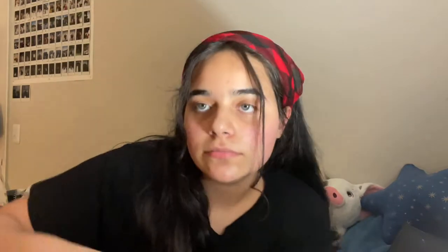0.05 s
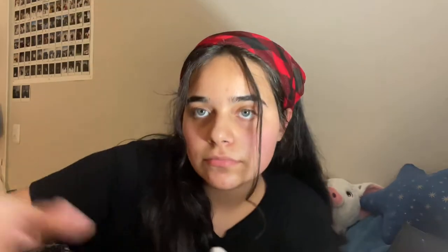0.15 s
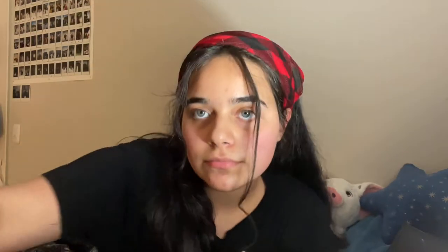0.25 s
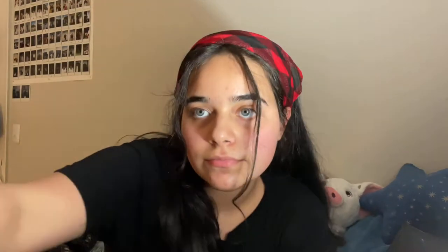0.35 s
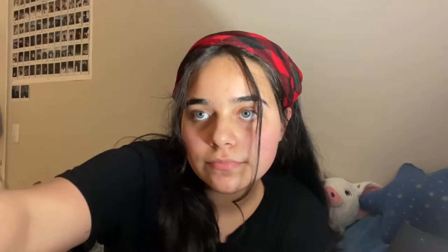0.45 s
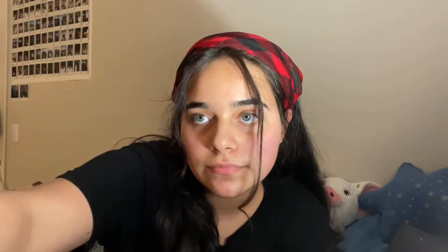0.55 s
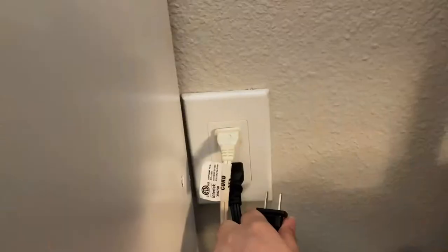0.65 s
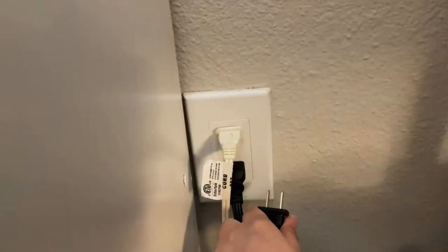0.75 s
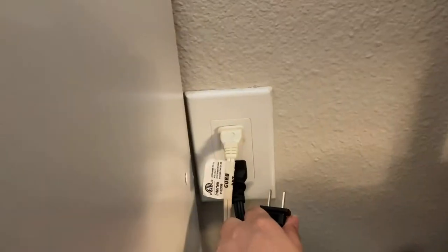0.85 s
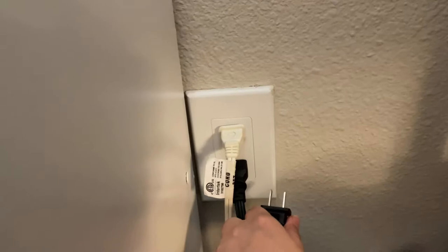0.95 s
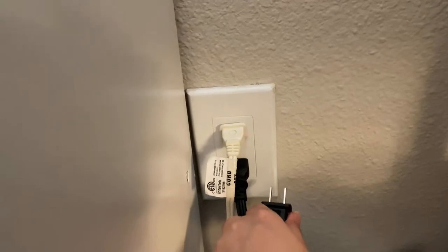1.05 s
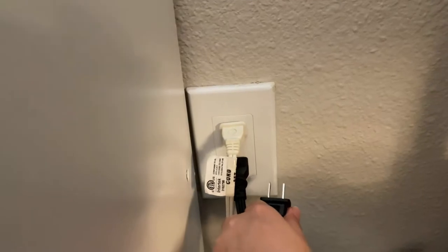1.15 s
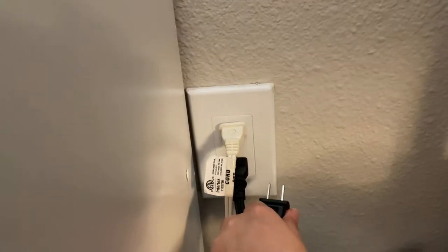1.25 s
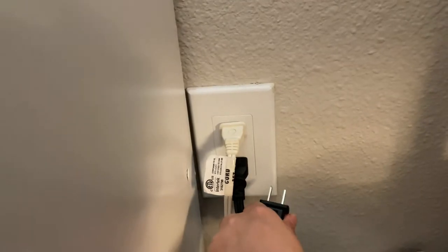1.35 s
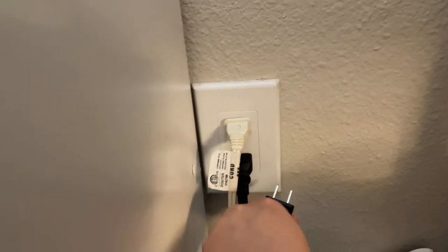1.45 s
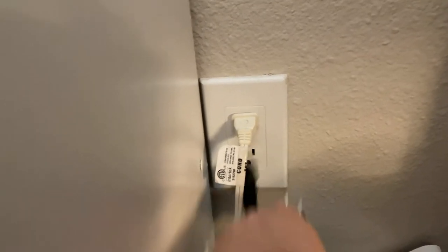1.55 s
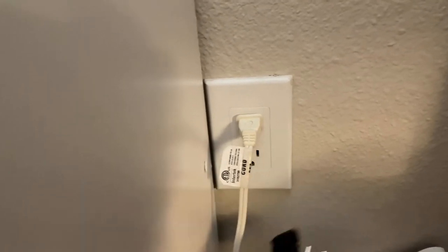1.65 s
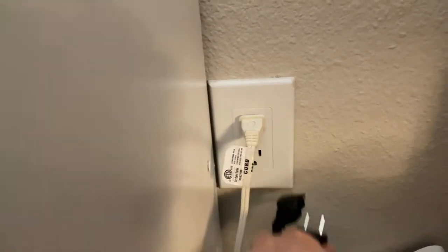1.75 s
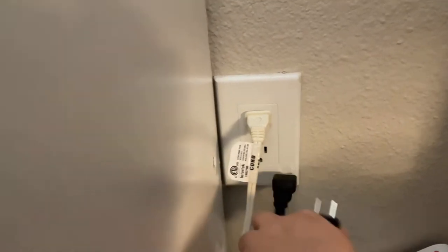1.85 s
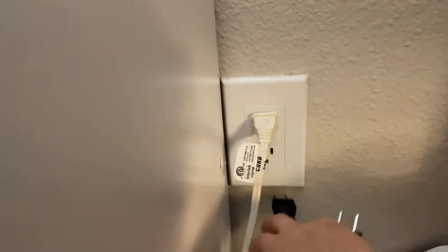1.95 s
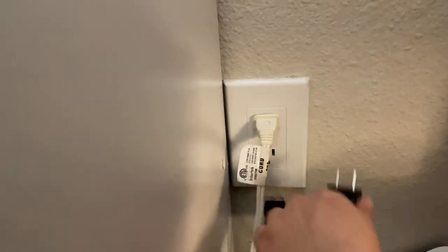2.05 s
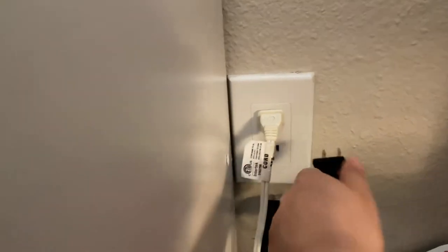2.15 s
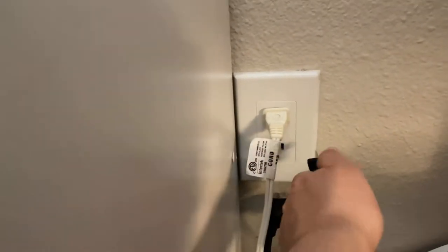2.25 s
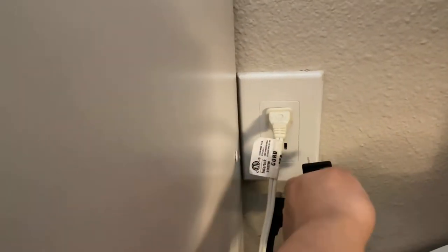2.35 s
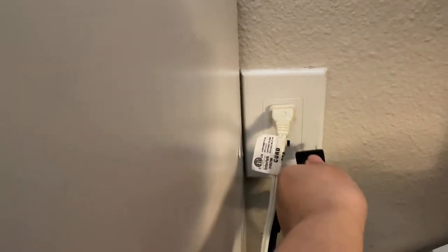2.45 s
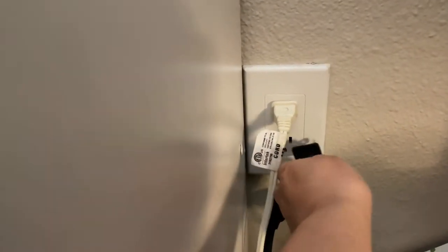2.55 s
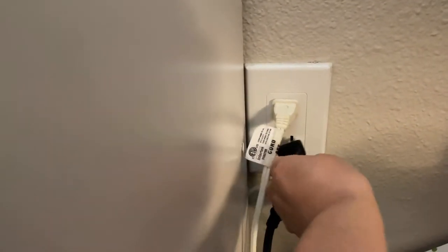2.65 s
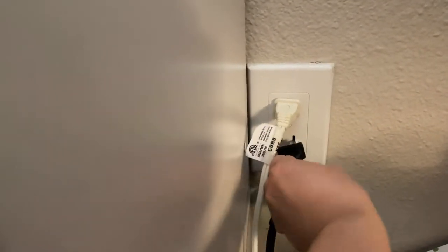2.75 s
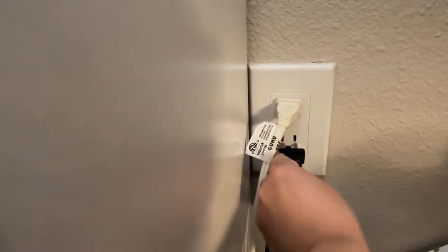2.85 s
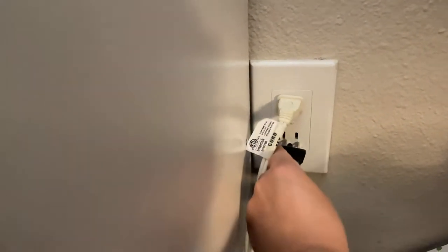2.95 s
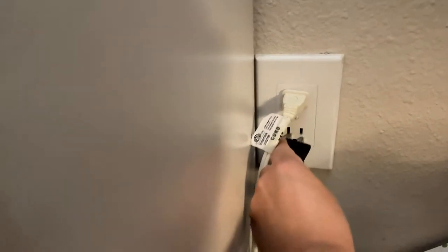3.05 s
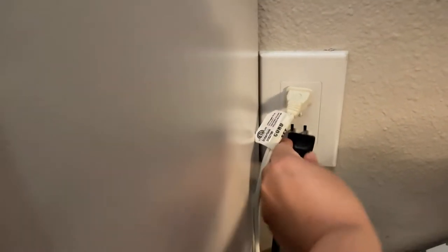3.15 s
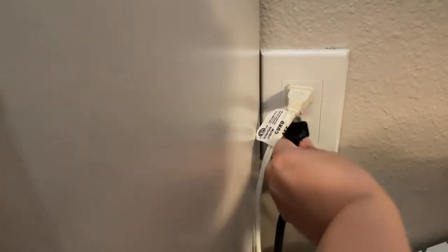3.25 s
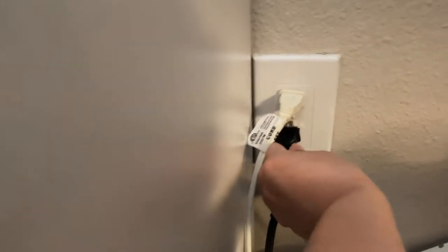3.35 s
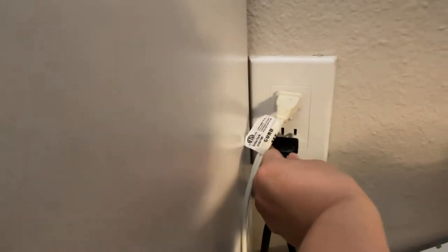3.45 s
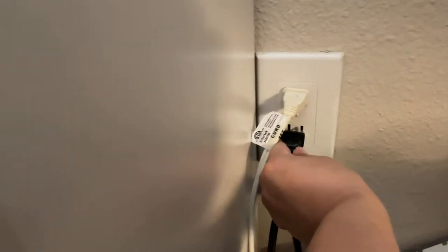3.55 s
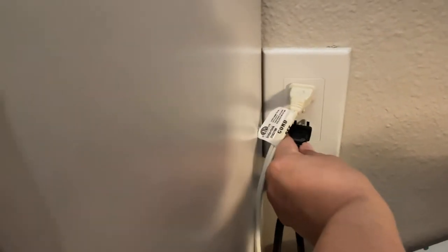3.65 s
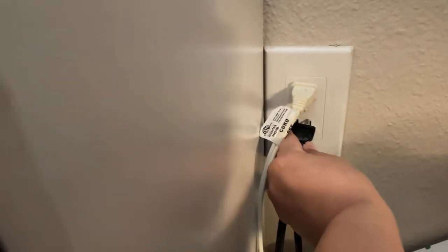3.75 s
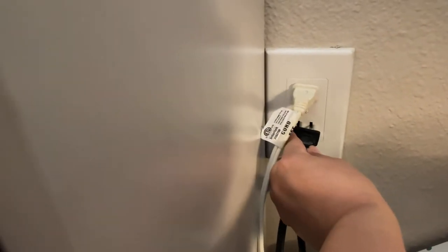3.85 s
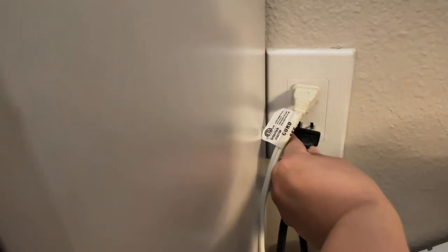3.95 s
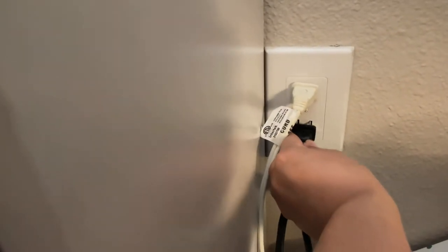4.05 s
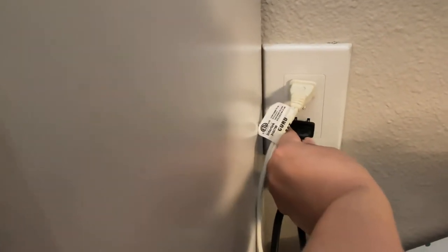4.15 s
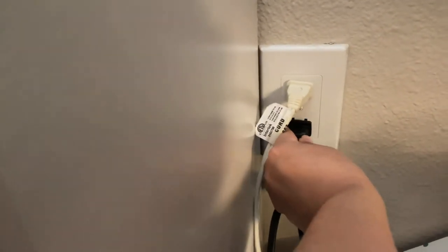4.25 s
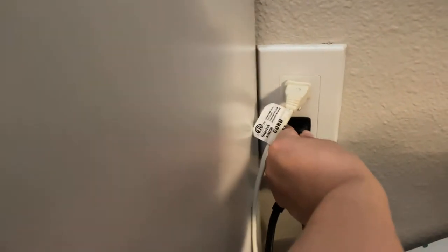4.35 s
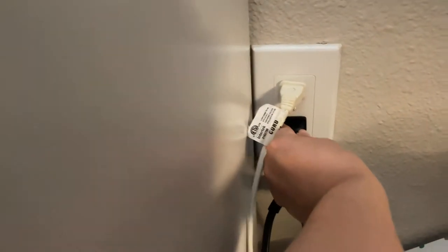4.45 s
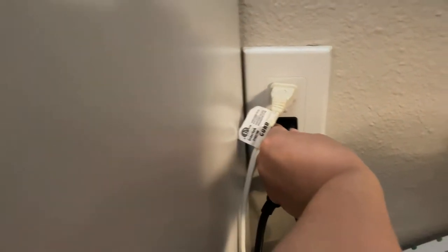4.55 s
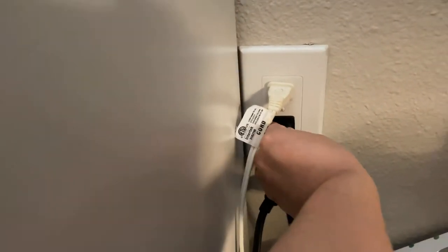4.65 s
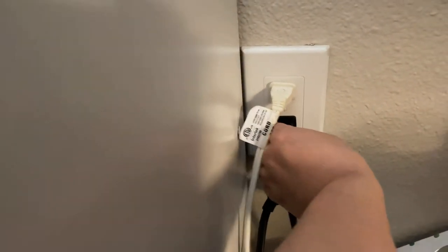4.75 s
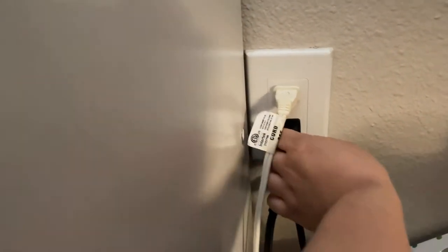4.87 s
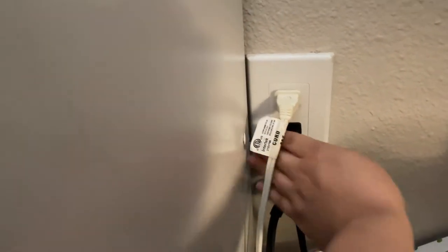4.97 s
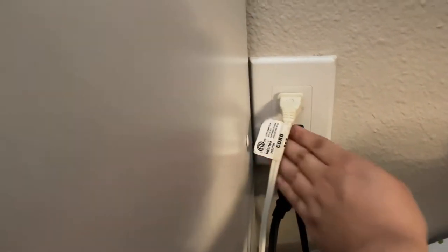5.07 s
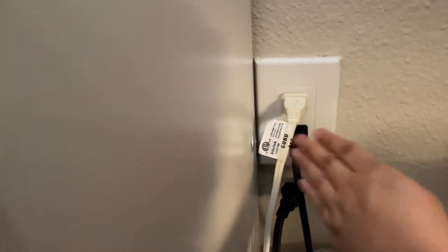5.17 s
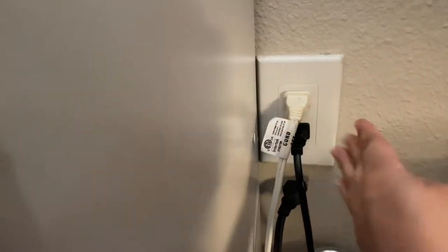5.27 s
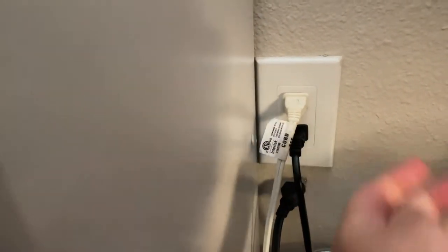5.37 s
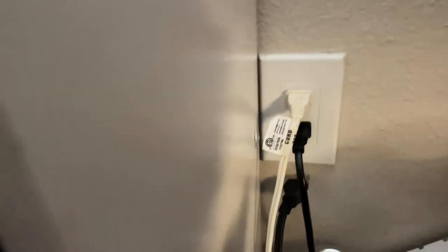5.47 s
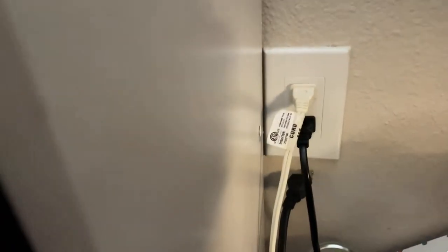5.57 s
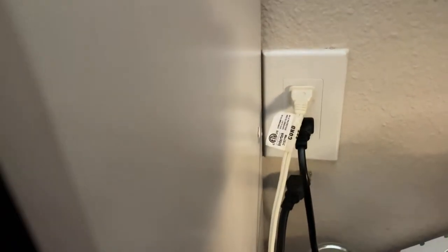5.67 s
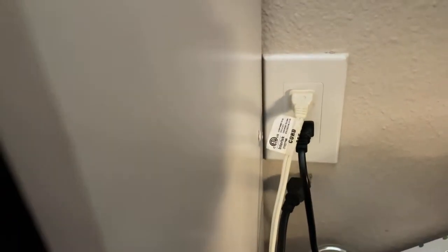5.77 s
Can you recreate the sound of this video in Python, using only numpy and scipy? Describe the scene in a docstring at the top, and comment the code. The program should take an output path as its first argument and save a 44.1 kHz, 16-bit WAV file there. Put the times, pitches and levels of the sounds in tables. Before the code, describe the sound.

A fading sleeve rustle with soft low thuds opens over a faint hum, then total silence for an instant. A plug snaps out of a wall outlet with sharp plastic clicks and hollow wall booms; another is fumbled in with lighter clicks, scrapes and rattles. Handling thins to hum and faint hiss. Close stereo microphone, small dry room.

```python
"""A sleeve sweeps past over soft wall thuds in a humming room, then everything drops out for a moment.
After it a hand pulls a plug from a wall outlet, with the hardest clicks, and fumbles another one in.
Clicks ring modes of cover plate, plug body and prongs; shoves boom in the hollow wall; fingers and cord
scrape in between as filtered noise. At the end the handling thins out and leaves the hum and faint hiss."""
import sys
import numpy as np
from scipy import signal
from scipy.fft import rfft, irfft, next_fast_len
from scipy.io import wavfile
from scipy.ndimage import uniform_filter1d

SR = 44100
rng = np.random.default_rng(int(sys.argv[2]) if len(sys.argv) > 2 else 0)


def digitize_waveform(pressure):
    """Quantize a signal to 16-bit integers and store it at the path in sys.argv[1].

    Rows of a 2-D input are taken as channels; values are limited to [-1, 1].
    """
    field = np.atleast_2d(pressure).T
    bounded = np.clip(field, -1, 1)
    quanta = np.round(bounded * 32767).astype(np.int16)
    wavfile.write(sys.argv[1], SR, quanta)


N = 256441  # length in samples


def gain_of(db):
    """Amplitude factor of a level in dB."""
    return 10 ** (np.asarray(db) / 20)


def evened(x):
    """Scale to an rms of 1."""
    return x / np.sqrt(np.mean(x ** 2) + 1e-20)


def peaked(x, db):
    """Scale to a peak level in dB."""
    return gain_of(db) * x / abs(x).max()


def read(points, hz):
    """Read a curve between its points on a logarithmic frequency axis."""
    f, value = np.transpose(points)
    return np.interp(np.log(hz + 1), np.log(f + 1), value)


def add(mix, s, sound):
    """Lay a sound into the mix at a time in seconds."""
    part = mix[:, round(s * SR):][:, :sound.shape[1]]
    part += sound[:, :part.shape[1]]


def wander(cutoff_hz):
    """Slow random drift of rms 1: noise below the cutoff."""
    return evened(signal.lfilter(*signal.butter(2, cutoff_hz, fs=SR), rng.standard_normal(N)))


def ring(modes, spot, favoured_hz=None, octaves=0.63, stretch=1):
    """Dying modes; spot and grip weigh and detune each one, and favour those near one pitch."""
    hz, db, t60 = np.transpose(modes)[:, :, None]
    t60 = t60 * stretch
    t = np.arange(round(t60.max() * SR)) / SR
    weight, detune = spot[:, :len(modes), None]
    db = db + 1.6 * weight
    hz = hz * (1 + .02 * detune)
    if favoured_hz:
        db = db - 8 * (np.log2(hz / favoured_hz) / octaves) ** 2
    sign = (-1) ** np.arange(len(modes))[:, None]  # neighbouring modes move a spot in opposite ways
    swing = 1 - np.exp(-3.0 * hz * t)  # each mode takes part of a cycle to swing up
    decay = gain_of(db - 60 * t / t60)
    return (sign * swing * decay * np.sin(2 * np.pi * hz * t)).sum(0)


# Modes of the cover plate before detuning: f/Hz, relative level/dB, t60/s
PLATE_MODES = [(598, -2, 0.0031), (676, -6.5, 0.0021), (782, 0.5, 0.009), (950, -6.5, 0.023),
               (1100, -2.5, 0.023), (1586, -2.5, 0.023), (1743, 4.5, 0.045)]
# Modes of the plug body before detuning: f/Hz, relative level/dB, t60/s
PLUG_MODES = [(2226, -1, 0.0095), (2266, 3.5, 0.0037), (2763, -1, 0.0034), (2964, -5.5, 0.009),
              (3180, -2, 0.0017), (3990, 0, 0.0042), (4880, -0.5, 0.0039), (5288, -4.5, 0.0056),
              (4863, -1, 0.001)]
# Modes of the metal prongs before detuning: f/Hz, relative level/dB, t60/s
PRONG_MODES = [(6940, 0.5, 0.002), (8020, -0.5, 0.0023), (8060, -5, 0.01), (9760, -1, 0.0021),
               (10780, -5, 0.0016), (11500, -20, 0.00061), (14200, -12.5, 0.0021)]
# Plastic contacts, peaks ahead of the ports:
# t/s, plate level/dB, favoured plate f/Hz, plug level/dB, prong level/dB
CLICKS = [(0.314, -54, 456, -67, -71), (0.46, -53, 533, -64, -68), (0.921, -82, 700, -83, -60),
          (1.506, -65, 650, -63, -58), (1.53, -60, 949, -64, -65), (1.587, -25.5, 770, -24, -32.5),
          (1.592, -35.5, 810, -11, -19), (1.617, -25.5, 886, -20, -35.5), (1.672, -31, 950, -34, -74.5),
          (1.835, -69.5, 800, -72, -62), (1.89, -45, 557, -31.5, -66), (1.899, -35, 920, -38, -49),
          (1.937, -54, 886, -51, -74), (1.992, -12, 850, -21, -50), (2.125, -47, 568, -45, -60),
          (2.153, -39, 553, -66, -69), (2.657, -48, 825, -58.5, -82), (2.728, -49.5, 787, -45.5, -45),
          (2.809, -58.5, 497, -51, -63), (2.836, -54, 482, -61, -71), (2.873, -38.5, 970, -51, -77),
          (2.88, -36.5, 1220, -28.5, -43.5), (2.941, -50.5, 1010, -76, -83), (3, -47, 483, -58.5, -70),
          (3.18, -71.5, 780, -63, -58), (3.236, -66.5, 793, -75, -69), (3.255, -55, 855, -41, -59.5),
          (3.267, -47.5, 880, -46.5, -54.5), (3.346, -39, 833, -51.5, -58.5), (3.422, -38.5, 915, -42, -47),
          (3.449, -29.5, 1120, -27, -35.5), (3.534, -63, 810, -56, -67), (3.573, -64, 765, -47.5, -54.5),
          (3.594, -49.5, 668, -50, -55), (3.616, -46, 770, -52, -64), (3.809, -40, 706, -45.5, -52),
          (3.834, -59, 780, -64.5, -70), (3.852, -47, 920, -52.5, -64), (4.029, -35, 1133, -35.5, -41.5),
          (4.036, -35.5, 892, -48.5, -67.5), (4.081, -47, 472, -40, -55), (4.134, -48, 1187, -43, -51.5),
          (4.161, -51, 946, -49, -60), (4.243, -51.5, 748, -66.5, -73.5), (4.344, -40, 810, -27.5, -31),
          (4.486, -47.5, 1787, -45.5, -45), (4.513, -50, 500, -49.5, -76.5), (4.675, -45.5, 990, -43, -61),
          (4.691, -47.5, 960, -69.5, -70), (4.739, -28.5, 1100, -29, -34.5), (4.797, -51, 665, -53, -76),
          (4.811, -38, 594, -51, -54), (4.867, -46.5, 526, -53.5, -56.5), (4.903, -54.5, 970, -55, -69),
          (4.986, -67, 805, -55, -54), (4.93, -61.5, 920, -77, -77), (4.997, -57, 1266, -70, -62)]
CONTACT_S = .001  # the impact, and the crest of the chatter envelope, come this late
PLUG_HZ, PLUG_KNEE_DB, PLUG_OCTAVES_PER_DB = 2310, -33.5, .025  # harder clicks ring the plug higher


def clicks():
    """Each contact is one sharp impact amid a short chatter that rings plate, plug and prongs together."""
    out = np.zeros((2, N))
    size = 512
    index = np.arange(size)
    chatter = rng.standard_normal((len(CLICKS), 3, size))
    spots = rng.standard_normal((len(CLICKS), 3, 2, 10))
    u = index / SR / CONTACT_S
    impact = index == round(CONTACT_S * SR)
    tick = 0.88 * signal.firwin(15, 7000, pass_zero=False, fs=SR)  # the bare snap of metal on metal
    for (s, plate_db, plate_hz, plug_db, prong_db), jolts, spot in zip(CLICKS, chatter, spots):
        sides = jolts[0] + .5 * jolts[1:]  # each side hears it a little apart
        force = 0.33 * sides * abs(jolts[0]) * u * np.exp(-u) + impact
        plug_hz = PLUG_HZ * 2 ** (PLUG_OCTAVES_PER_DB * max(plug_db - PLUG_KNEE_DB, 0))
        plate = ring(PLATE_MODES, spot[0], plate_hz, octaves=.36)
        plug = ring(PLUG_MODES, spot[1], plug_hz, octaves=0.77)
        prongs = ring(PRONG_MODES, spot[2])
        prongs[:len(tick)] += tick
        for body, db in (plate, plate_db), (plug, plug_db), (prongs, prong_db):
            add(out, s, peaked(signal.convolve(force, body[None]), db))
    return out


# Modes of the hollow wall before detuning and stretching: f/Hz, relative level/dB, t60/s
WALL_MODES = [(61.2, -3, 0.75), (101.47, -4, 0.37), (135, -0.5, 0.093), (178.5, -10.5, 0.24),
              (214.1, -2.5, 0.13), (259, -1.5, 0.1), (296.5, 7, 0.077), (367.1, 2.5, 0.06), (410, -3, 0.28),
              (480, -14.5, 0.48)]
# Shoves against the wall, peaks ahead of the ports: t/s, level/dB, favoured f/Hz
THUDS = [(0.012, -34.5, 135), (0.056, -33, 135), (0.312, -51, 334), (0.46, -45, 106), (0.541, -41, 118),
         (0.708, -56.5, 364), (0.785, -60.5, 366), (1.598, -21, 112), (1.622, -29.5, 111), (1.674, -35, 87),
         (1.894, -38, 124), (1.992, -19.5, 183.6), (2.056, -30, 122.5), (2.163, -36, 117.5),
         (2.734, -42, 180), (2.829, -43.5, 133), (3.29, -39, 109), (3.422, -39, 122), (3.618, -38, 96.3),
         (3.668, -49.5, 117.8), (3.82, -44, 124), (4.039, -29.5, 112), (4.086, -35.5, 91.5),
         (4.353, -34.5, 115.3), (4.499, -36.5, 63)]
# Target ring up to this pitch, set on the fourth wall mode; higher thuds die sooner by this power
THUD_T60_S, THUD_HZ, THUD_SHORTENS = .17, 120, 0.66


def thuds():
    """A soft push, then a little shuddering, sets the hollow wall booming."""
    out = np.zeros((1, N))
    t = np.arange(1500) / SR
    spots = rng.standard_normal((len(THUDS), 2, 10))
    shudder = rng.standard_normal((len(THUDS), len(t)))
    for (s, db, hz), spot, jolts in zip(THUDS, spots, shudder):
        force = (t == 0) + .05 * jolts * np.exp(-t / 0.0052)
        push = np.convolve(force, np.hanning(70))  # the rounded window makes the push soft
        t60 = max(THUD_T60_S * min(THUD_HZ / hz, 1) ** THUD_SHORTENS, .03)
        boom = ring(WALL_MODES, spot, hz, octaves=1.1, stretch=t60 / WALL_MODES[3][2])
        add(out, s, peaked(signal.oaconvolve(push, boom), db)[None])
    return out


# Fingers and cord sliding over plastic, levels ahead of pressure and ports:
# t/s, base length/s, dull rub level/dB, rub f/Hz, scrape level/dB, swell from start to end/dB
STROKES = [(0.702, 0.019, -75, 358, -101, -1.5), (0.893, 0.061, -85.5, 686, -98, 4.5),
           (1.07, 0.11, -87.5, 950, -95, 2), (1.359, 0.17, -85, 413, -71.5, 8),
           (1.504, 0.083, -61, 556, -64, 14), (1.635, 0.13, -68, 548, -61.5, -8),
           (1.759, 0.034, -73.5, 504, -83, -3), (1.787, 0.13, -83.5, 430, -77, 6),
           (1.914, 0.22, -63.5, 492, -75.5, -17), (2.001, 0.21, -45, 500, -67.5, -31.5),
           (2.152, .13, -69, 470, -69.5, -15), (2.355, .2, -99, 396, -91.5, -2.5),
           (2.551, 0.065, -75, 434, -92, -9), (2.633, 0.14, -72, 564, -85, 9),
           (2.8, 0.11, -60, 389, -77, 6), (2.904, 0.16, -67.5, 529, -76.5, -6),
           (3.079, 0.11, -70.5, 597, -78, 5.5), (3.219, 0.22, -64.5, 480, -83, -8.5),
           (3.391, 0.072, -54, 805, -65, 13.5), (3.471, 0.13, -67, 474, -77.5, -15.5),
           (3.565, 0.097, -61.5, 716, -78, -1.5), (3.67, 0.055, -74, 690, -93, -10),
           (3.778, 0.12, -67, 578, -82, -6), (3.994, 0.072, -68.5, 680, -86.5, 17.5),
           (4.088, 0.16, -67.5, 520, -78.5, -4.5), (4.233, 0.051, -73, 696, -84.5, -0.5),
           (4.306, 0.088, -62, 536, -71, 9.5), (4.392, 0.06, -71.5, 396, -81, -4),
           (4.457, .11, -68, 465, -81.5, -16), (4.771, .2, -75, 600, -72.5, -9.5),
           (4.923, 0.11, -80, 580, -75.5, 7), (5.094, 0.066, -80.5, 410, -100, 5),
           (5.343, .013, -84, 432, -94, -4.5), (5.443, 0.045, -52, 950, -65, -2.5),
           (5.488, .2, -84.5, 453, -84.5, -4.5), (5.673, 0.029, -88.5, 451, -78, -4.5)]
SWISH_DB, SWISH_PER_RUB_DB = -5, -0.1351  # swish against the scrape; lighter rubs are airier
RUB_AT_DB = -72  # rub level at which the swish has its usual share
RATTLE_S, RATTLE_FADE_DB = 0.05, -27  # base length and swell of the loose rattle after every click
RATTLE_DB = -29.5, -32.5, -32  # its rub, scrape and swish against the click's plate, plug and prongs
RATTLE_PITCH = .8  # a rattle rubs below the click's plate pitch


def slides():
    """Strokes and click rattles as (s, base length, rub dB, rub Hz, scrape dB, swish dB, swell dB)."""
    rows = []
    for s, length, rub_db, hz, scrape_db, swell_db in STROKES:
        swish_db = scrape_db + SWISH_DB + SWISH_PER_RUB_DB * (rub_db - RUB_AT_DB)
        rows.append((s, length, rub_db, hz, scrape_db, swish_db, swell_db))
    for s, plate_db, hz, plug_db, prong_db in CLICKS:
        rub_db, scrape_db, swish_db = np.add((plate_db, plug_db, prong_db), RATTLE_DB)
        rows.append((s + .004, RATTLE_S, rub_db, RATTLE_PITCH * hz, scrape_db, swish_db, RATTLE_FADE_DB))
    return rows


RELEASE_S, SWISH_FADE = .07, 1.5  # strokes let go slowly; the swish swells and fades more steeply
SLIPS_PER_S = 700.


def strokes():
    """Clumped slips of skin and plastic, over a smooth hiss, excite the bodies; the swish rings nothing."""
    out, rows = np.zeros((2, N)), slides()
    noise = rng.standard_normal((len(rows), 10, 10000))
    grips = rng.standard_normal((len(rows), 3, 2, 10))
    sizes = rng.exponential(1, (len(rows), 10000))
    onsets = rng.random((len(rows), 10000)) < SLIPS_PER_S / SR
    slips = gain_of(5.0 * np.minimum(sizes, 3)) * onsets
    airy = signal.firwin(31, [5300, 13500], pass_zero=False, fs=SR)
    for row, hiss, grip, slip in zip(rows, noise, grips, slips):
        s, length, rub_db, rub_hz, scrape_db, swish_db, swell_db = row
        size = round(np.clip(length + .035, .015, .225) * SR)  # room for the slow release
        hiss, slip = hiss[:, :size], slip[:size]
        clumps_db = 2.4 * evened(uniform_filter1d(hiss[9], size=400))
        rise = 0.0033 + 0.045 / (1 + gain_of(-swell_db - 4.5))  # a stroke that fades starts abruptly
        t = np.arange(size) / SR
        ramps = np.minimum(t / rise, (t[-1] - t) / RELEASE_S)
        edges = np.sin(np.pi / 2 * np.clip(ramps, 0, 1)) ** 2
        pressure = edges * gain_of(clumps_db + swell_db * np.linspace(-.5, .5, size))
        # rub, scrape, swish: level dB, modes, favoured Hz, share of slips, t60 s
        layers = ((rub_db, WALL_MODES[6:] + PLATE_MODES[:6], rub_hz, .4, .018),
                  (scrape_db, PLATE_MODES[6:] + PLUG_MODES, 2700., .5, .006),
                  (swish_db, [], None, .25, 0))
        for k, (db, modes, favoured_hz, grit, t60) in enumerate(layers):
            shared, apart = hiss[3 * k], hiss[3 * k + 1:3 * k + 3]
            texture = grit * evened(slip * shared) + shared + .5 * apart
            if modes:
                damped = [(hz, mode_db, t60) for hz, mode_db, _ in modes]  # fingers damp what they touch
                body = ring(damped, grip[k], favoured_hz, octaves=0.78)
                drive = pressure * texture
            else:
                body = airy
                drive = pressure ** SWISH_FADE * texture
            add(out, s - rise / 2, gain_of(db) * evened(signal.oaconvolve(drive, body[None])))
    return out


GAP = .561, .678  # silent from, to (s); the sweep lasts until it begins
# An arm and sleeve sweep past: t/s, relative level/dB, treble above it/dB
SWEEP = [(0.0, -41, 5), (0.015, -39.5, -10), (0.027, -48.5, 2), (0.197, -57.5, -8.5), (0.27, -59, -3),
         (0.456, -70.5, 0), (0.56, -67, 3.5)]
# Colour of the cloth noise, relative: f/Hz, level per Hz/dB
CLOTH_COLOUR = [(88, -40), (150, -0.5), (208, -9.5), (248, -20), (535, -14), (701, -34.5), (1640, -20.5),
                (2140, -27), (2550, -33.5), (4910, -35.5), (7500, -45.5), (15000, -44.5)]


def sweep():
    """A rush of cloth noise in uneven folds that fades; its treble fades at its own pace."""
    s, db, treble_db = np.transpose(SWEEP)
    hiss = rng.standard_normal((3, round(GAP[0] * SR)))
    hz, t, z = signal.stft(hiss[0] + .5 * hiss[1:], SR, nperseg=512)
    folds = rng.standard_normal((len(t), len(hz))).T
    folds = uniform_filter1d(uniform_filter1d(folds, size=8, axis=0), size=5, axis=1)
    folds_db = 3.1 * evened(folds)
    high = np.clip(np.log2(hz / 2400 + 1e-9) / 0.15, 0, 1)[:, None]  # the treble starts at 2400 Hz
    level_db = np.interp(t, s, db) + high * np.interp(t, s, treble_db)
    colour = evened(gain_of(read(CLOTH_COLOUR, hz)))[:, None]
    out = np.zeros((2, N))
    add(out, 0, signal.istft(z * colour * gain_of(folds_db + level_db), SR, nperseg=512)[1])
    return out


# Reverberation of the room: f/Hz, t60/s
ROOM_T60 = [(100, 0.42), (500, 0.11), (2000, 0.061), (8000, 0.044)]


def room(x):
    """Sparse taps of random sign, each band dying at its own speed."""
    taps = np.zeros((2, SR // 2))
    at = np.arange(200, SR // 2 - 20, 20)
    at = at + rng.integers(0, 20, (2, len(at)))
    np.put_along_axis(taps, at, rng.choice([-1., 1.], at.shape), 1)
    hz, t, z = signal.stft(taps, SR, nperseg=256)
    decay = gain_of(-60 * t / read(ROOM_T60, hz)[:, None])
    tail = signal.istft(z * decay, SR, nperseg=256)[1]
    tail[1] = .5 * tail[0] + 0.69 * tail[1]  # the sides are partly alike
    return signal.fftconvolve(x, tail / np.linalg.norm(tail[0]), axes=1)[:, :N]


# Phase by which the left microphone port leads: f/Hz, lead/rad
PORT_LEAD = [(0, 0), (120, .1), (250, .8), (1000, 1.1), (3000, 1.6), (5000, 2.3), (6500, -1.1),
             (8300, -3.14), (9000, -4.3), (11500, -6.3), (13000, -7), (14500, -9.3), (17000, -9.4)]
# Level of the left port above the right: f/Hz, level/dB
PORT_LEAN = [(60, -2), (250, -4), (1000, 0), (4500, 4), (7500, 4.5), (9700, -5), (11500, 0)]


def ports(x):
    """Two microphone ports hear the near sounds with different phase and level."""
    size = next_fast_len(N)
    hz = np.fft.rfftfreq(size, 1 / SR)
    # each port takes half of the difference
    half = gain_of(read(PORT_LEAN, hz) / 2) * np.exp(.5j * read(PORT_LEAD, hz))
    return irfft(rfft(x, size) * np.array([half, 1 / half]), size)[:, :N]


# Colour of the room's rumble and hiss, relative: f/Hz, level per Hz/dB
AIR_COLOUR = [(13, -45.5), (25, -19), (60, 2.5), (100, -2), (140, -8), (170, -19.5), (210, -25.5),
              (310, -35.5), (500, -39.5), (1000, -45.5), (2600, -49), (10900, -58), (16000, -76.5)]
# Left-right likeness of that noise: f/Hz, likeness (1 = the same)
AIR_SAME = [(60, 0.89), (240, 0.92), (950, 0.65), (3770, 0.43), (15000, 0.2)]
AIR_DB = -57.5  # rms before the left-right balance
HUM_HZ, HUM_DB = 121.4, -55.5  # pitch, and rms before wavering and balance


def room_tone():
    """Rumble and faint hiss with drifting patches, and a wavering mains hum."""
    frames, hz = N // 512 + 5, np.fft.rfftfreq(2048, 1 / SR)
    a, b, c, d, patches = rng.standard_normal((frames, 1025, 5)).T
    patches = evened(uniform_filter1d(uniform_filter1d(patches, 10, 0), 8, 1))
    same = np.clip(read(AIR_SAME, hz), -1, 1)[:, None]
    left = a + 1j * b
    right = same * left + np.sqrt(1 - same ** 2) * (c + 1j * d)
    z = np.array([left, right]) * gain_of(read(AIR_COLOUR, hz)[:, None] + 0.5 * patches)
    noise = signal.istft(z, nperseg=2048, noverlap=1536)[1][:, :N]
    air = gain_of(AIR_DB) * evened(noise)
    hum_level = np.sqrt(2) * gain_of(HUM_DB + 1.9 * wander(2.0))
    hum = hum_level * np.sin(2 * np.pi * HUM_HZ * np.arange(N) / SR)
    return (air + hum) * gain_of([[-1.1], [1.1]])  # the right side is a little louder


ROOM_DB = -13.5  # reverberation against the direct clicks and thuds


def scene():
    """Handling sounds pass the ports, clicks and thuds with reverberation; the room tone lies beneath."""
    hits = clicks() + thuds()
    near = hits + gain_of(ROOM_DB) * room(hits) + strokes() + sweep()
    return ports(near) + room_tone()


EDGE_HZ = 16400  # upper band limit


def record(dry):
    """The microphone loses deep bass, the sound drops out for a moment, then the top is cut off."""
    t = np.arange(N) / SR
    dry = signal.sosfilt(signal.butter(2, 45., "high", fs=SR, output="sos"), dry)
    heard = np.clip(np.maximum((GAP[0] - t) / .002, (t - GAP[1]) / .003), 0, 1)  # short fades at both ends
    band = signal.firwin(511, EDGE_HZ, window=("kaiser", 9), fs=SR)
    return signal.oaconvolve(dry * heard, band[None], "same")


dry = scene()
out = record(dry)
digitize_waveform(out)
```